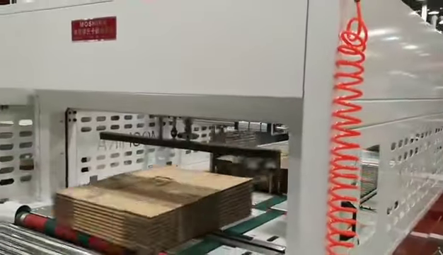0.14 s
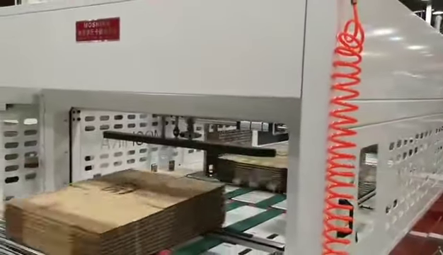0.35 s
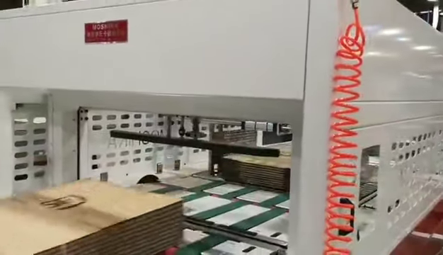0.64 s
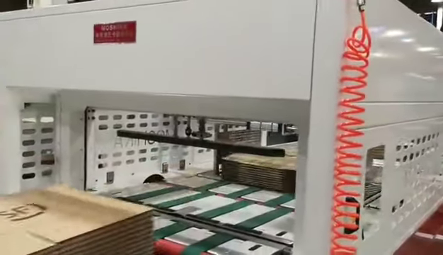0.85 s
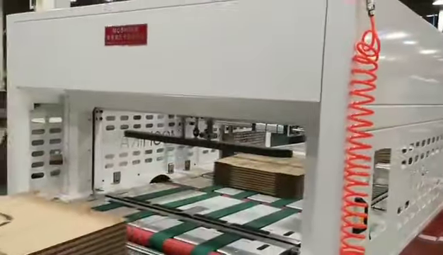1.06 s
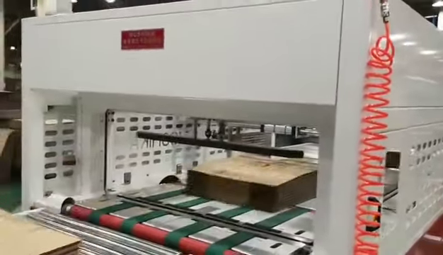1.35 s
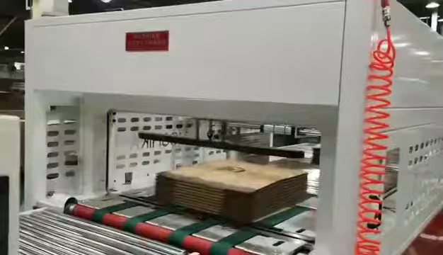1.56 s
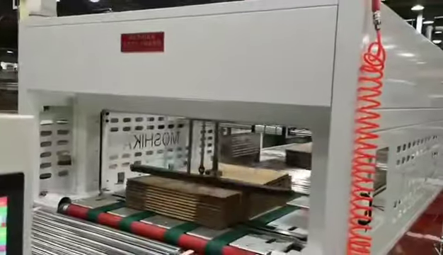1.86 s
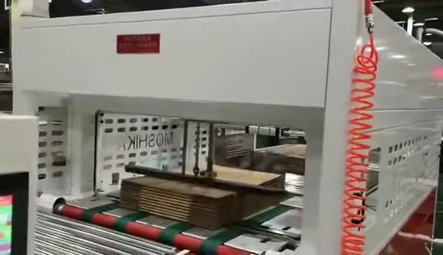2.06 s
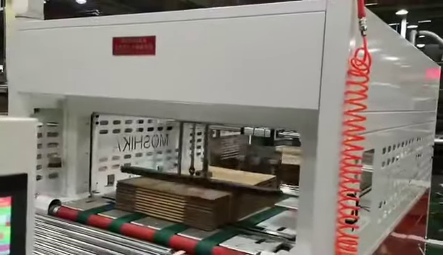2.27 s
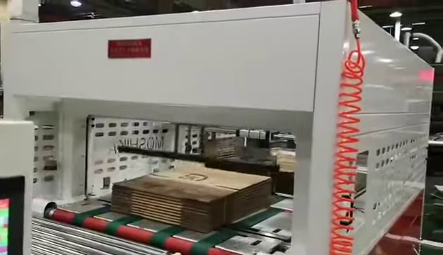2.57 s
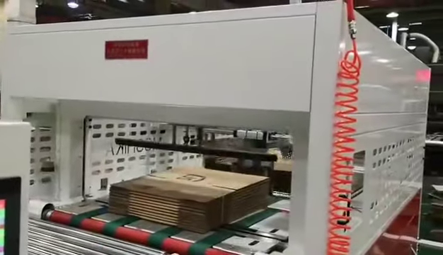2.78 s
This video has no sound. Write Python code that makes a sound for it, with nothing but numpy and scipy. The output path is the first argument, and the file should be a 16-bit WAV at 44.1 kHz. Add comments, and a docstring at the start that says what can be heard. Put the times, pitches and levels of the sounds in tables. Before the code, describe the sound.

A cardboard bundling machine's conveyor roars steadily, with sharp snaps, air puffs and steel clacks.

```python
"""Strapping machine in a factory hall

A stereo microphone stands by the machine; belts and loose rollers roar, mostly on the right, over a deep
rumble and a motor hum. A bundle of cardboard rolls in with a squeak, stops snap close by, air valves
puff, and the steel press bar clacks down and lifts again. The level dips around the sharpest snap."""
import sys
import numpy as np
from scipy import signal
from scipy.fft import rfft, irfft
from scipy.io import wavfile
from scipy.ndimage import uniform_filter1d

SR = 44100
rng = np.random.default_rng(int(sys.argv[2]) if len(sys.argv) > 2 else 0)


def generate_wav(sig):
    """Save sig (samples, or channels by samples) to the path in sys.argv[1] as 16-bit PCM at SR."""
    pcm = np.round(np.clip(np.atleast_2d(sig).T, -1, 1) * 32767).astype(np.int16)
    wavfile.write(sys.argv[1], SR, pcm)


N = 129654
TIME = np.arange(N) / SR
EVENT_TIME = np.arange(SR // 2) / SR  # the half second given to one blow, puff or squeak

# reverberation of the hall: frequency_hz, t60_s
HALL_DECAY = [(200, 0.81), (2000, 0.15), (6500, 0.14)]
# rumble of the machinery: frequency_hz, density_db
RUMBLE_SPECTRUM = [(12, -1), (26, -1.5), (50, 1.5), (80, 1.5), (135, 1.5), (165, 2), (205, -4), (280, -7),
                   (400, -13.5), (600, -22.5), (1200, -42)]
# likeness of rumble and belt roar at the two microphones: frequency_hz, correlation
RUMBLE_LIKENESS = [(60, .998), (130, .99), (220, .93), (330, .8), (520, .3)]
ROAR_LIKENESS = [(300, 0.05), (600, -0.72), (850, .2), (1250, 0.49), (1860, -0.14), (2860, -0.31),
                 (4400, 0.2), (6700, .3)]
# swells of the deep rumble, its upper bass, the belt roar and the press drive: time_s, level_db
DEEP_SWELL = [(0, 1), (.3, 0), (.52, -2.5), (.65, -0.5), (.8, -2), (.9, 3.5), (1.0, -2.5), (1.2, 0.5),
              (1.3, -4.5), (1.55, 2.5), (1.69, -5), (1.79, 1.5), (1.94, 0), (2.02, -7.5), (2.17, -2),
              (2.26, 2.5), (2.34, -5.5), (2.44, -0.5), (2.56, -5), (2.67, 3.5), (2.81, -6), (2.92, 3)]
UPPER_BASS_SWELL = [(0.04, -23), (0.6, -20), (0.65, -29), (0.69, -22), (0.71, -24.5), (1.02, -21),
                    (1.05, -25), (1.22, -18), (1.25, -24), (1.37, -22), (1.4, -25.5), (1.5, -20.5),
                    (1.7, -28.5), (1.8, -17), (1.83, -21.5), (2.13, -26.5), (2.37, -21), (2.5, -26.5),
                    (2.78, -19.5), (2.82, -27.5), (2.85, -21.5), (2.91, -24)]
ROAR_SWELL = [(0, -1), (.7, 0.44), (.9, -1.5), (1.35, 0), (1.72, 0), (1.8, -1), (1.93, 1), (2.05, 1),
              (2.2, 0.5), (2.6, 0.3), (2.75, -0.5), (2.94, 1)]
DRIVE_SWELL = [(1.66, -46), (1.72, -1), (1.8, -4), (1.93, 1), (1.99, -49)]
# motor hum and whines: pitch_hz, level_db, wander_hz
MOTOR_TONES = [(112.1, -24.5, 2.13), (239, -32, 1.32), (733.5, -49.5, 2), (860, -56.5, 3), (2638, -39, 2.5),
               (4600, -55.5, 8.5)]
# belt roar at each microphone: frequency_hz, density_db
ROAR_LEFT_SPECTRUM = [(200, -19.5), (550, 2), (750, 2.5), (1100, 3), (1500, 3.5), (1850, 7), (2600, 0),
                      (3200, -1), (4300, -8), (5500, -5), (6300, -16)]
ROAR_RIGHT_SPECTRUM = [(200, -23.5), (550, 1.5), (750, 3), (1050, 6), (1450, 1.5), (1850, 9.5),
                       (2250, 11.5), (2800, 11), (3200, 1), (3800, -1.5), (4400, -11.5), (5600, -3),
                       (6300, -18)]
# noise of clattering steel, escaping air and a snap: frequency_hz, density_db
CLATTER_SPECTRUM = [(500, -42), (1400, -12), (1900, -4), (2700, 3), (3500, -2.5), (4500, -13), (5600, -10),
                    (6300, -18.5), (7000, -45.5)]
AIR_SPECTRUM = [(1000, -18), (2500, -4.5), (3600, 3.5), (4400, 5), (5200, 4), (5800, 7), (6300, -12),
                (7000, -39)]
SNAP_SPECTRUM = [(1000, -24), (2300, -8.5), (3000, 2), (4200, -8), (4800, 2), (5300, 1.5), (5800, 1.5),
                 (6400, 2.5), (7300, -33)]
# sliding cardboard and guides: start_s, swell_s, level_db, release_t60_s, pitch_hz, width_hz
SLIDE_SQUEAKS = [(1.048, 0.034, -31.5, .12, 5470, 350), (1.107, 0.02, -24, 0.12, 5700, 520),
                 (2.47, 0.013, -28, 0.21, 6070, 69.3), (2.474, .025, -31, .16, 5100, 69.6)]
# dull knocks of the bundles: start_s, level_db, pitch_hz
BUNDLE_KNOCKS = [(.1, -22, 1190), (0.142, -18.5, 1100), (.172, -23, 1160), (0.73, -23, 1300),
                 (2.484, -18, 1370), (2.591, -21, 1040)]
# air let out of the cylinders: start_s, hold_s, level_db, release_t60_s
AIR_PUFFS = [(0.08, 0.1, -30, 0.14), (0.731, 0.011, -26, 0.05), (1.411, 0.036, -25, 0.14),
             (1.539, 0.009, -22, .05), (1.64, 0.048, -27.5, 0.29), (1.979, 0.024, -30, 0.39),
             (2.388, 0.048, -25, 0.19), (2.476, 0.024, -31, 0.75), (2.623, 0.048, -34.5, 0.15),
             (2.71, 0.01, -29.5, 0.46)]
# whine of the press drive: pitch_hz, level_db
DRIVE_TONES = [(2020, -37.5), (2280, -38), (2630, -32), (2780, -45.5)]
# modes of the steel frame, press bar, latch and valve body: pitch_hz, level_db, t60_s
FRAME_MODES = [(1105, -14, 0.085), (1766, -1.5, .12), (1940, -6, 0.21), (2158, 3, 0.16), (2400, -5.5, .08),
               (2606, 1, 0.12), (2624, 1, 0.054), (2826, 1.5, 0.2), (3065, -5, 0.2), (3370, -11.5, .16)]
BAR_MODES = [(3478, 0, .09), (3946, -6, .13), (4900, -4, .12), (5130, -1.5, .13), (5470, 0, .12),
             (5733, -2, .14), (6090, -9, .14)]
LATCH_MODES = [(3570, -8, 0.069), (3860, 4, 0.067), (4300, -3, .07)]
VALVE_MODES = [(2900, -2, .04), (3480, -1, .04), (4100, -5, .03), (4850, -1, .04), (5850, 0, .045)]
# clacks of bar and frame: start_s, level_db, clatter_t60_s, right_minus_left_db
FRAME_CLACKS = [(.091, -21, 0.36, 5), (.168, -24, 0.21, 7), (1.653, -22, 0.2, 3), (1.697, -20, .1, 6),
                (1.967, -15.5, 0.084, -1), (1.977, -14, 0.51, 5), (1.999, -24.5, 0.22, 1),
                (2.096, -22.5, 0.066, 12), (2.255, -21.5, .15, 6.5), (2.408, -17.5, 0.23, 12),
                (2.493, -20, 0.17, 10), (2.506, -23, 0.065, 31), (2.587, -21.5, .08, 9)]
# blows that ring the bar: start_s, level_db
BAR_BLOWS = [(1.665, -26), (1.985, -16), (2.006, -22), (2.142, -29.5), (2.585, -29)]
# snaps of valves and stops: start_s, level_db, t60_s
VALVE_SNAPS = [(1.414, -38, .025), (1.4305, -18.5, 0.027), (1.497, -30, .03), (1.529, -24, 0.037),
               (1.5552, -10, 0.071), (1.564, -13, 0.043), (2.421, -31, .03)]
# brief dip of the whole sound: time_s, level_db
LEVEL_DIP = [(1.39, 0), (1.44, -3), (1.51, -3), (1.555, -5.5), (1.62, -6), (1.68, -1), (1.74, -1)]
# instants when the treble drops out: centre_s, half_width_s, depth_db
TREBLE_GAPS = [(1.522, 0.0032, -17), (1.544, 0.0032, -43)]


def amp(db):
    """Decibels to gain."""
    return 10 ** (np.asarray(db) / 20)


def unit(x):
    """Scales to rms 1."""
    return x / np.sqrt(np.mean(x ** 2) + 1e-20)


def at_hz(points, hz):
    """Reads a (frequency_hz, value) curve on a log frequency axis."""
    point_hz, value = np.transpose(points)
    return np.interp(np.log(hz + 1), np.log(point_hz + 1), value)


def level(points):
    """Gain along a (time_s, level_db) curve."""
    return amp(np.interp(TIME, *np.transpose(points)))


def pan(right_db):
    """Left and right gains of constant total power."""
    return unit(amp([[-right_db / 2], [right_db / 2]]))


def add(mix, start_s, sound):
    """Mixes a stereo sound in at start_s."""
    part = mix[:, max(round(start_s * SR), 0):][:, :sound.shape[1]]
    part += sound[:, :part.shape[1]]


def rise(rise_s=0.0031):
    """An event's straight climb to full level."""
    return np.minimum(EVENT_TIME / rise_s, 1)


def decay(t, t60, hold_s=0):
    """Holds for hold_s, then falls 60 dB every t60 seconds."""
    return np.exp(-np.log(1000) * np.maximum(t - hold_s, 0) / t60)


def lowpass(x, hz):
    """Steep cut above hz."""
    kernel = signal.firwin(401, hz, window=("kaiser", 9), fs=SR)
    return signal.oaconvolve(x, kernel[None], "same", axes=1)


def drift(hz):
    """Slow random motion of rms 1, up to about hz."""
    shape = np.exp(-(np.fft.rfftfreq(N, 1 / SR) / hz) ** 2)
    return unit(irfft(rfft(rng.standard_normal(N)) * shape, N))


def coloured(spectrum, size=SR // 2):
    """A short stretch of stereo noise with this spectrum."""
    shape = amp(at_hz(spectrum, np.fft.rfftfreq(size, 1 / SR)))
    return unit(irfft(rfft(rng.standard_normal((2, size))) * shape, size))


def fuzzy_tone(hz, width_hz, size=SR // 2):
    """A short stretch of stereo noise in one resonance."""
    shape = 1 / (1 + ((np.fft.rfftfreq(size, 1 / SR) - hz) / width_hz) ** 2) ** 2
    return unit(irfft(rfft(rng.standard_normal((2, size))) * shape, size))


def ring(modes, lag_turns=0.16):
    """An object's modes after one blow, a little out of step at the two microphones."""
    sound = 0
    for hz, db, t60 in modes:
        turns = hz * EVENT_TIME + rng.random() + lag_turns * rng.standard_normal((2, 1))
        sound += amp(db) * decay(EVENT_TIME, t60) * np.sin(2 * np.pi * turns)
    return sound / np.sqrt(sum(amp(db) ** 2 for _, db, _ in modes) / 2)


def wash(left_spectrum, right_spectrum, likeness, patch_db, flicker_db, size):
    """Stereo noise with drifting spectral patches and a shared flicker, rms 1 per channel."""
    hop, hz = size // 4, np.fft.rfftfreq(size, 1 / SR)
    frames = N // hop + 5
    left_re, left_im, apart_re, apart_im, patches = rng.standard_normal((5, frames, len(hz)))
    patches = unit(uniform_filter1d(uniform_filter1d(patches, size=8, axis=0), size=7, axis=1))
    correlation = np.clip(at_hz(likeness, hz), -1, 1)
    left = left_re + 1j * left_im
    right = correlation * left + np.sqrt(1 - correlation ** 2) * (apart_re + 1j * apart_im)
    spectra = np.array([left * amp(at_hz(left_spectrum, hz)), right * amp(at_hz(right_spectrum, hz))])
    spectra *= amp(patch_db * patches + flicker_db * rng.standard_normal((frames, 1)))
    sound = signal.istft(spectra.swapaxes(1, 2), nperseg=size, noverlap=size - hop)[1][:, :N]
    return np.array([unit(side) for side in sound])


def hall(sound, level_db=-12.5):
    """The hall answers with a diffuse tail whose treble dies first."""
    hz, t, noise = signal.stft(rng.standard_normal((2, SR)), SR, nperseg=256)
    tail = signal.istft(noise * decay(t, at_hz(HALL_DECAY, hz)[:, None]), SR)[1]
    return amp(level_db) * signal.fftconvolve(sound, tail / np.linalg.norm(tail[0]), axes=1)[:, :N]


def rumble(deep_db=-17, upper_db=0.42, split_hz=138.7):
    """Machinery rumbles, nearly alike at both microphones; the upper bass swells on its own."""
    noise = wash(RUMBLE_SPECTRUM, RUMBLE_SPECTRUM, RUMBLE_LIKENESS, patch_db=1, flicker_db=0, size=4096)
    deep = irfft(rfft(noise) / (1 + (np.fft.rfftfreq(N, 1 / SR) / split_hz) ** 20), N)
    upper = unit(noise - deep)
    return amp(deep_db) * level(DEEP_SWELL) * deep + amp(upper_db) * level(UPPER_BASS_SWELL) * upper


def whine(hz, wander_hz, waver_db, rate_hz):
    """One tone of a drive, unsteady in pitch and level."""
    turns = np.cumsum(hz + wander_hz * drift(rate_hz)) / SR
    return unit(amp(waver_db * drift(rate_hz)) * np.sin(2 * np.pi * turns))


def motors(hum_below_hz=300):
    """Motors in the centre: thin whines, and a low hum that swells and sinks with the rumble."""
    out = np.zeros(N)
    for hz, db, wander_hz in MOTOR_TONES:
        swell = level(DEEP_SWELL) if hz < hum_below_hz else 1
        out += amp(db) * swell * whine(hz, wander_hz, waver_db=2, rate_hz=6)
    return out


def roller_rattle(rollers=10, taps_per_s=120, spread_db=4.5, t60_s=0.027):
    """Loose rollers tap at random, each with its own short burst of clatter."""
    out, size = np.zeros((2, N)), SR // 20
    for _ in range(rollers):
        strikes = rng.random(N) < taps_per_s / rollers / SR
        force = amp(spread_db * np.minimum(rng.exponential(1, N), 3))
        tap = coloured(CLATTER_SPECTRUM)[:, :size] * decay(TIME[:size], t60_s)
        out += signal.oaconvolve((strikes * force)[None], tap, axes=1)[:, :N]
    return unit(out)


def roller_rings(rings_per_s=70, low_hz=1857, high_hz=2967, spread_db=6, t60_s=0.12):
    """Loose rollers ring briefly, each tap at its own pitch."""
    out, t = np.zeros((2, N)), TIME[:SR // 8]
    for when, pitch, force in rng.random((round(rings_per_s * N / SR), 3)):
        hz = low_hz + pitch * (high_hz - low_hz)
        tone = np.sin(2 * np.pi * (hz * t + rng.random((2, 1))))
        add(out, when * N / SR, amp(spread_db * force) * decay(t, t60_s) * tone)
    return unit(out)


def conveyor(left_db=-25.5, right_db=-21, rattle_db=-35.5, rings_db=-31):
    """Belts roar over their loose rollers, mostly to the right of the microphone."""
    roar = wash(ROAR_LEFT_SPECTRUM, ROAR_RIGHT_SPECTRUM, ROAR_LIKENESS,
                patch_db=2, flicker_db=0.34, size=1024)
    rollers = amp(rattle_db) * roller_rattle() + amp(rings_db) * roller_rings()
    return level(ROAR_SWELL) * (amp([[left_db], [right_db]]) * roar + pan(right_db=7) * rollers)


def squeaks():
    """Thin squeaks swell and let go as cardboard and guides slide."""
    out = np.zeros((2, N))
    for start_s, swell_s, db, t60, hz, width_hz in SLIDE_SQUEAKS:
        envelope = rise(swell_s) * decay(EVENT_TIME, t60, hold_s=swell_s)
        add(out, start_s, amp(db) * envelope * fuzzy_tone(hz, width_hz))
    return out


def bundle_knocks(width_hz=390, t60_s=0.12):
    """Cardboard bundles knock dully, each in one broad resonance."""
    out = np.zeros((2, N))
    for start_s, db, hz in BUNDLE_KNOCKS:
        add(out, start_s, amp(db) * fuzzy_tone(hz, width_hz) * rise() * decay(EVENT_TIME, t60_s))
    return out


def air_puffs(rise_s=0.0017):
    """The cylinders let out short hisses of air, a little right of centre."""
    out = np.zeros((2, N))
    for start_s, hold_s, db, t60 in AIR_PUFFS:
        envelope = rise(rise_s) * decay(EVENT_TIME, t60, hold_s)
        add(out, start_s, amp(db) * pan(right_db=2.5) * envelope * coloured(AIR_SPECTRUM))
    return out


def press_drive():
    """The drive sings on the right while the bar travels down."""
    tones = sum(amp(db) * whine(hz, wander_hz=9, waver_db=3, rate_hz=18) for hz, db in DRIVE_TONES)
    return pan(right_db=7) * level(DRIVE_SWELL) * tones


def frame_clacks(clatter_db=1.5, ring_db=2):
    """Each clack is a burst of clatter and the ring of the steel frame, mostly on the right."""
    out = np.zeros((2, N))
    for start_s, db, t60, right_db in FRAME_CLACKS:
        clatter = amp(clatter_db) * coloured(CLATTER_SPECTRUM) * decay(EVENT_TIME, t60)
        frame = amp(ring_db) * ring(FRAME_MODES, lag_turns=0.35)
        add(out, start_s, amp(db) * pan(right_db) * rise() * (clatter + frame))
    return out


def press_bar(latch_s=2.413, latch_db=-19.5):
    """Blows ring the steel bar, and the latch that frees it clinks once."""
    out = np.zeros((2, N))
    for start_s, db in BAR_BLOWS:
        add(out, start_s, amp(db) * rise() * ring(BAR_MODES))
    add(out, latch_s, amp(latch_db) * ring(LATCH_MODES))
    return out


def snaps(valve_db=-5):
    """Valves and stops snap close to the microphone; each bright crack rings the valve body."""
    out = np.zeros((2, N))
    for start_s, db, t60 in VALVE_SNAPS:
        crack = coloured(SNAP_SPECTRUM) * decay(EVENT_TIME, t60)
        valve = amp(valve_db) * ring(VALVE_MODES, lag_turns=0.054)
        add(out, start_s, amp(db) * pan(right_db=2.5) * (crack + valve))
    return out


def scene():
    """The working machine over the steady noise of the hall; only the snaps reach the very top."""
    machine = frame_clacks() + press_bar() + bundle_knocks() + air_puffs() + squeaks()
    body = rumble() + motors() + press_drive() + conveyor() + machine + hall(machine)
    return lowpass(body, hz=6350) + snaps()


def record(dry, treble_above_hz=650, ceiling=0.95):
    """The level dips, the treble drops out for two instants, peaks are rounded and the top is cut off."""
    dipped = dry * level(LEVEL_DIP)
    bass = irfft(rfft(dipped) / (1 + (np.fft.rfftfreq(N, 1 / SR) / treble_above_hz) ** 4), N)
    gaps_db = sum(db * np.exp(-((TIME - centre_s) / width_s) ** 2)
                  for centre_s, width_s, db in TREBLE_GAPS)
    gapped = bass + amp(gaps_db) * (dipped - bass)
    rounded = gapped / (1 + (gapped / ceiling) ** 8) ** (1 / 8)
    return lowpass(rounded, hz=7400)


dry = scene()
out = record(dry)
generate_wav(out)
```